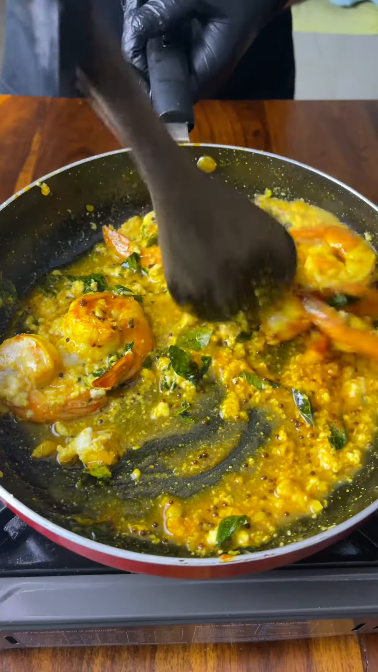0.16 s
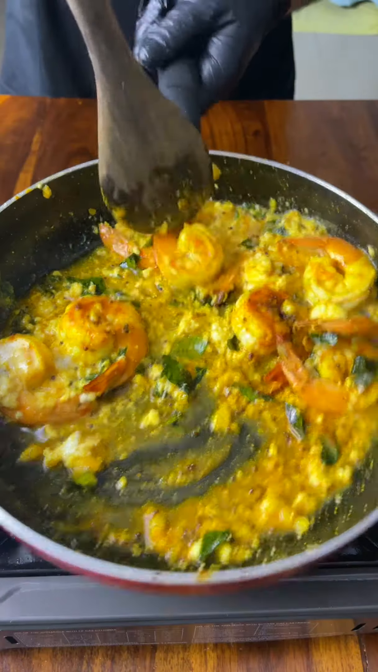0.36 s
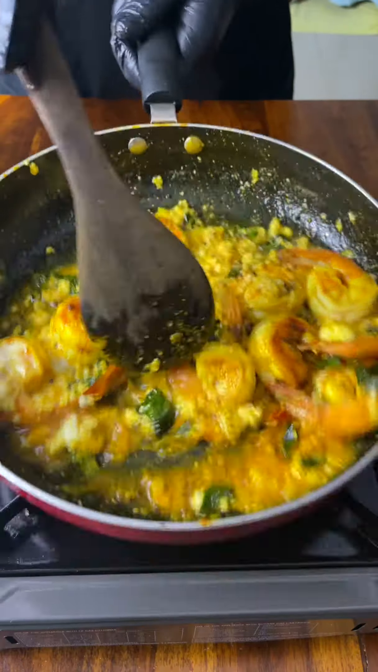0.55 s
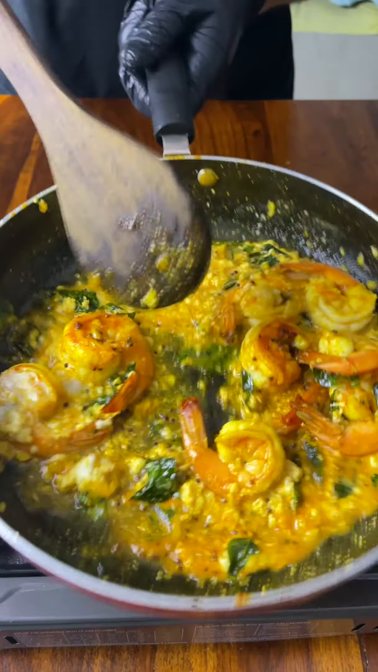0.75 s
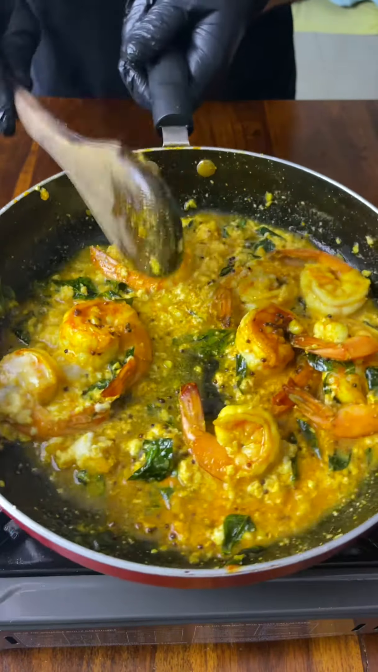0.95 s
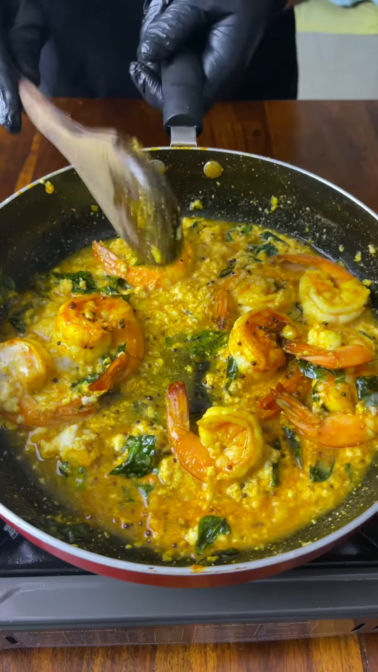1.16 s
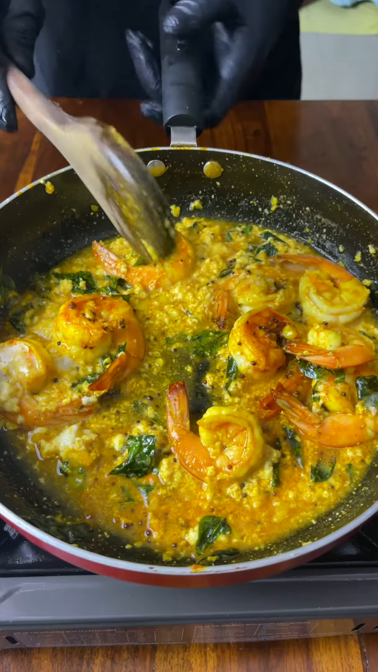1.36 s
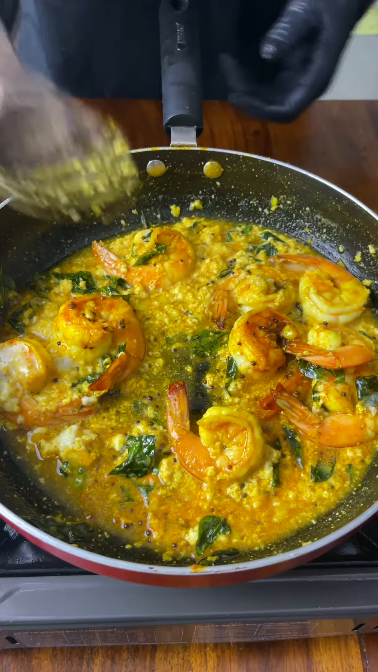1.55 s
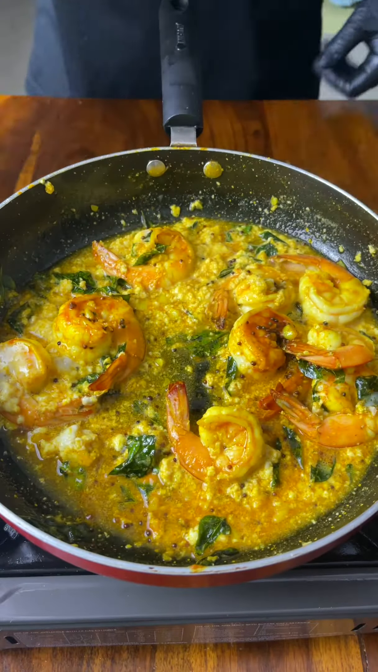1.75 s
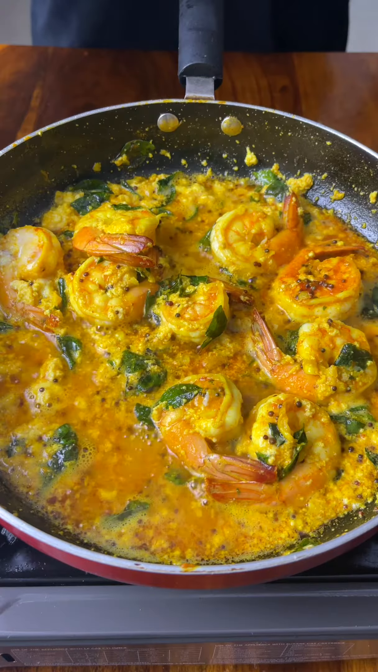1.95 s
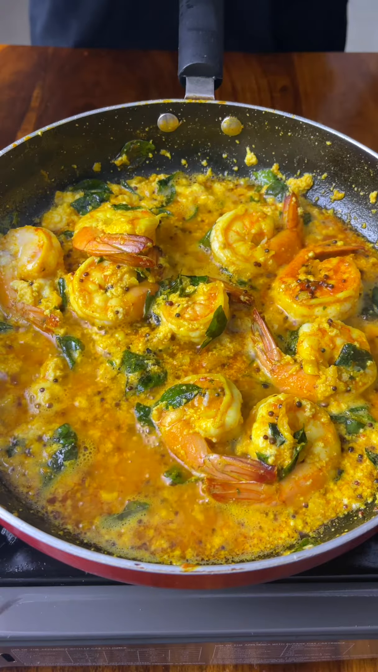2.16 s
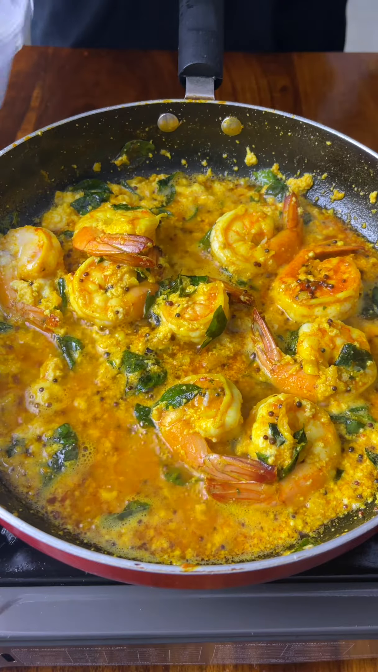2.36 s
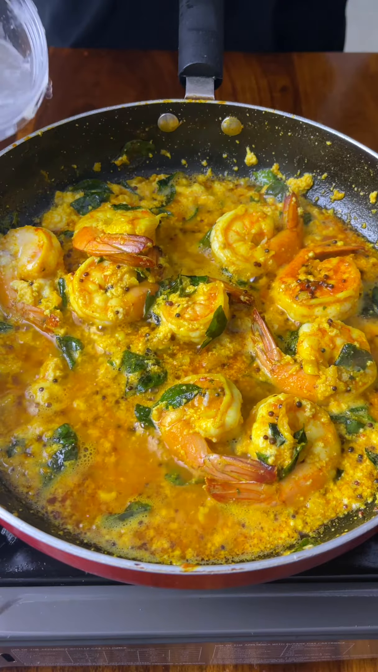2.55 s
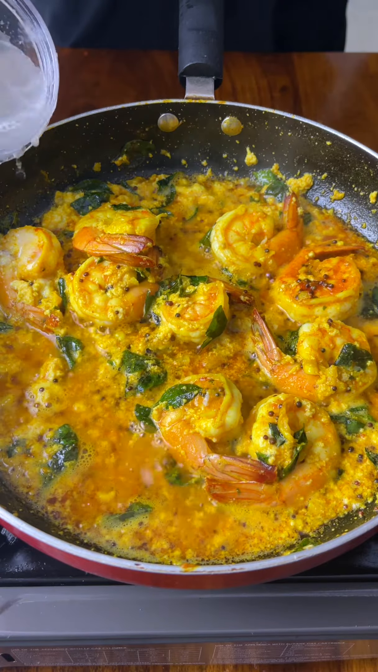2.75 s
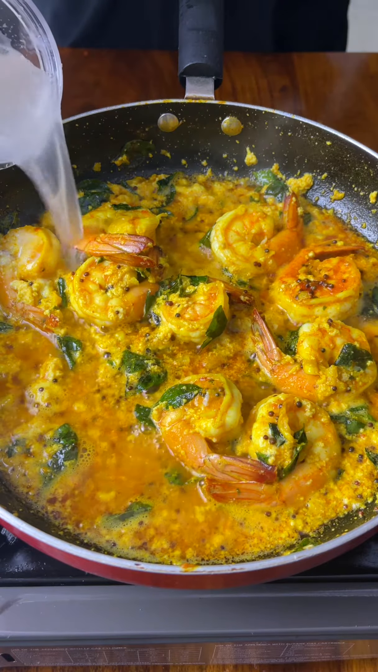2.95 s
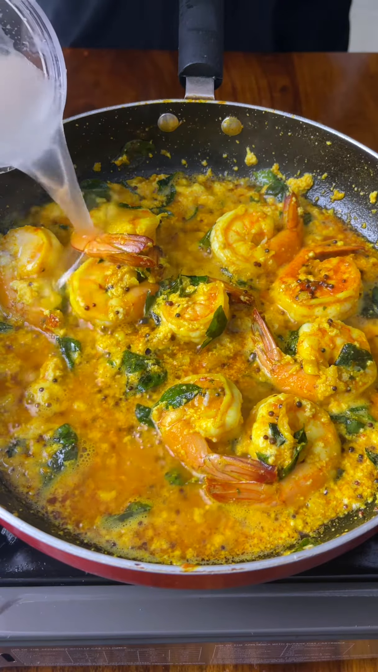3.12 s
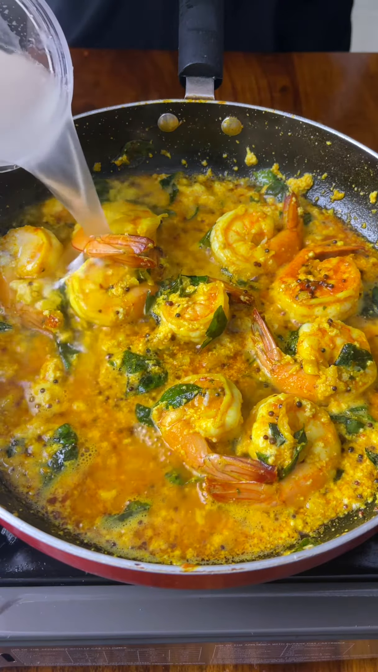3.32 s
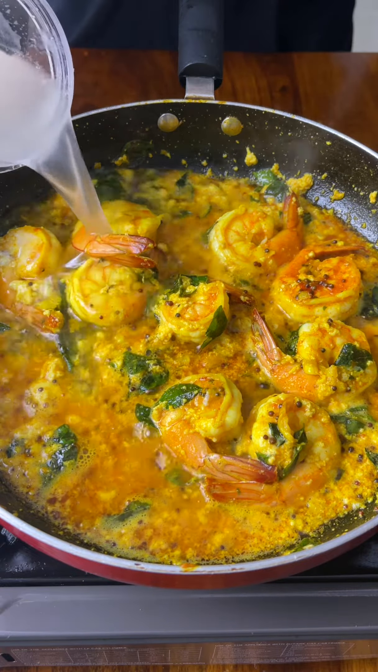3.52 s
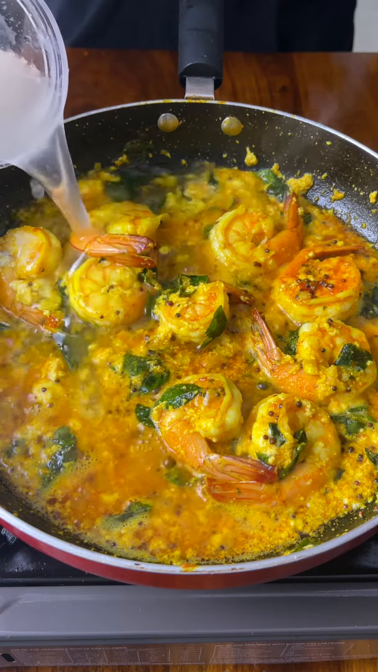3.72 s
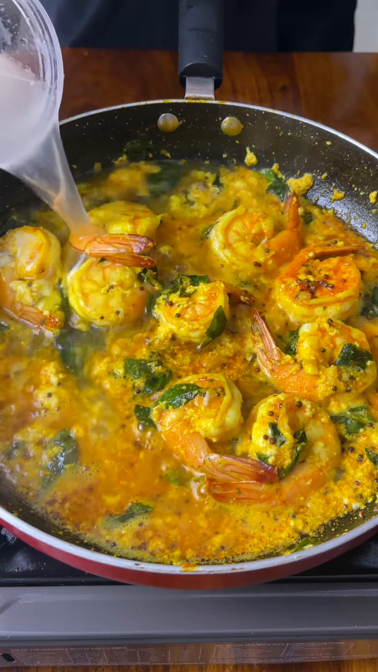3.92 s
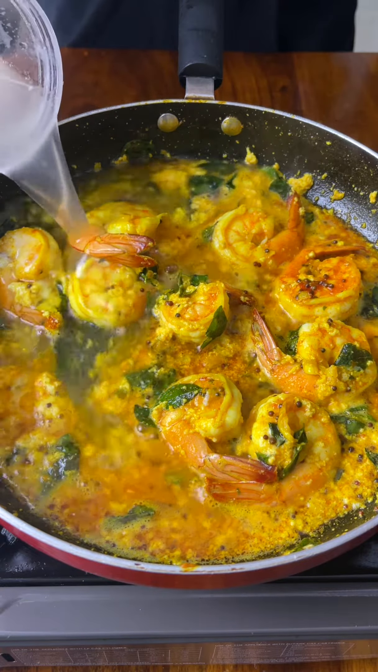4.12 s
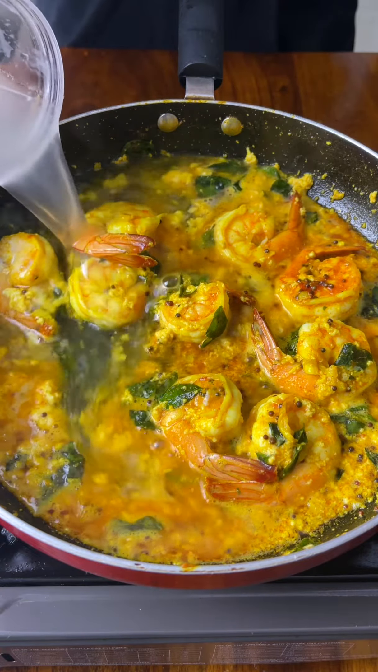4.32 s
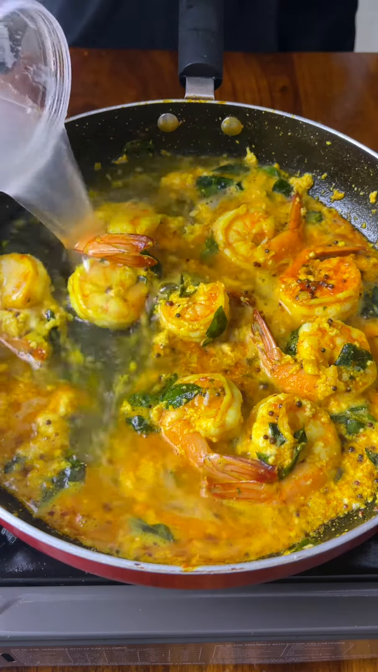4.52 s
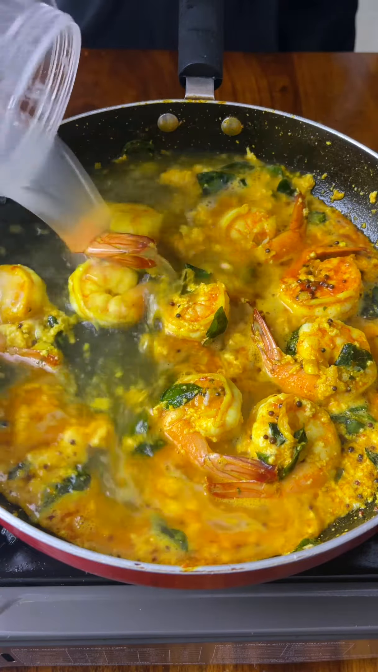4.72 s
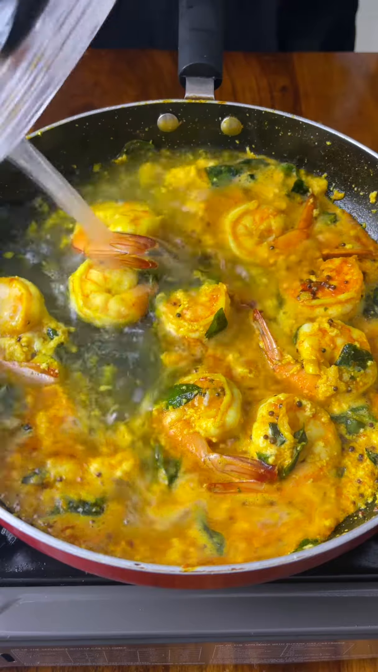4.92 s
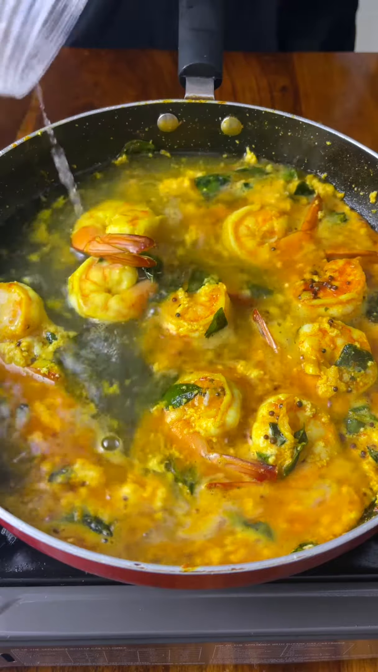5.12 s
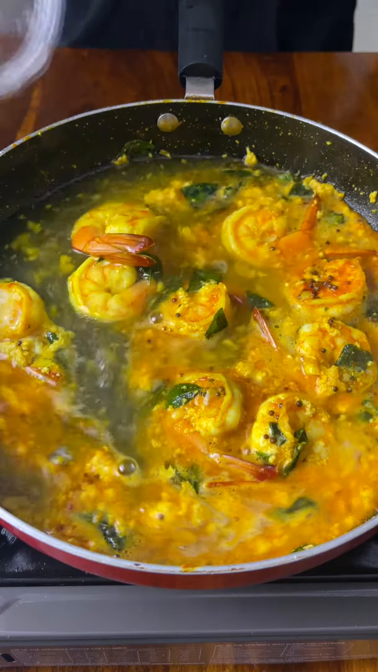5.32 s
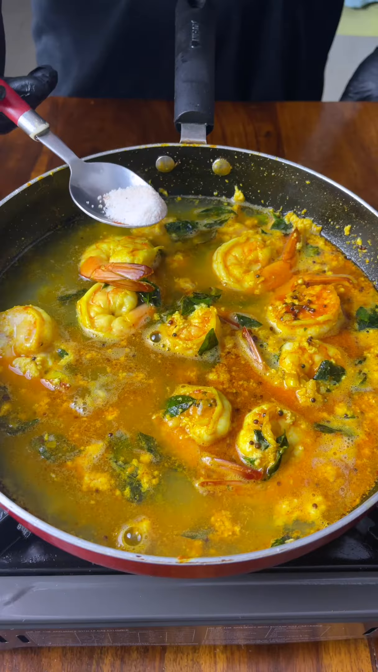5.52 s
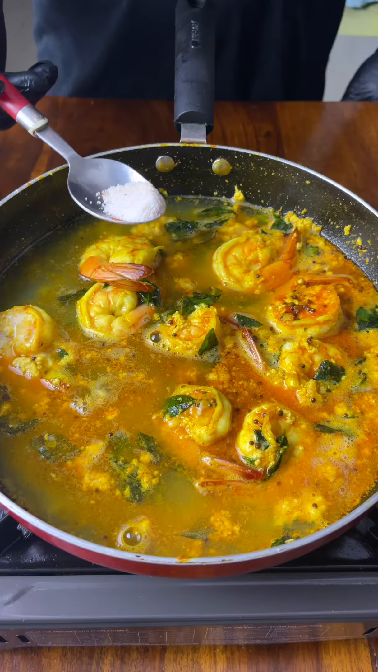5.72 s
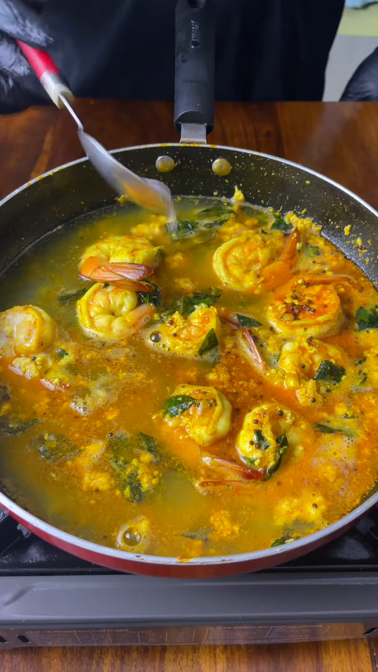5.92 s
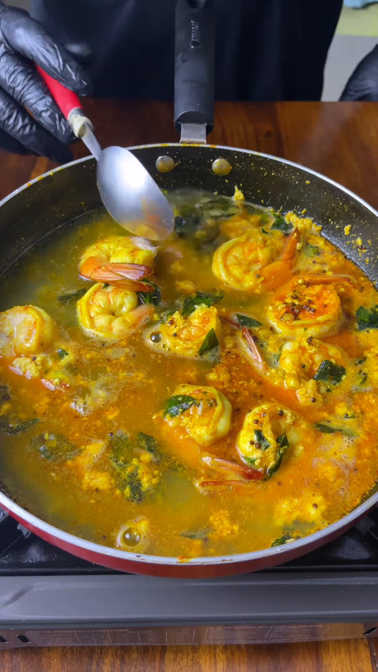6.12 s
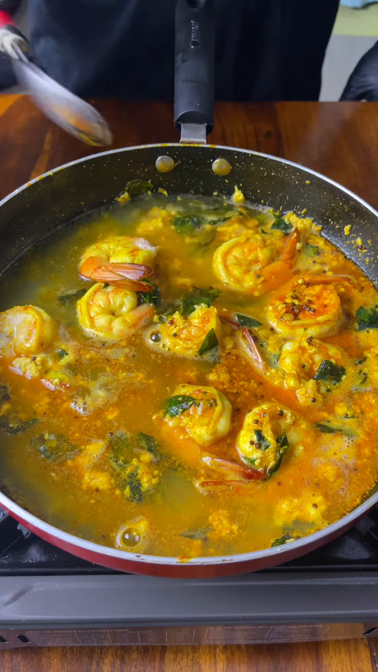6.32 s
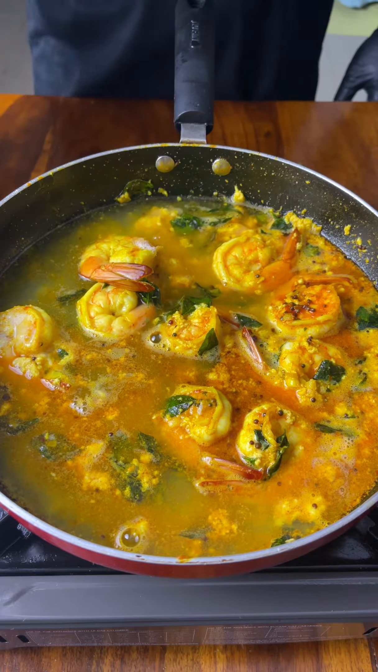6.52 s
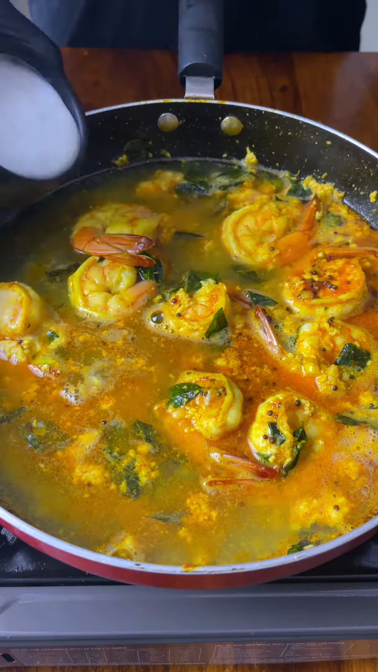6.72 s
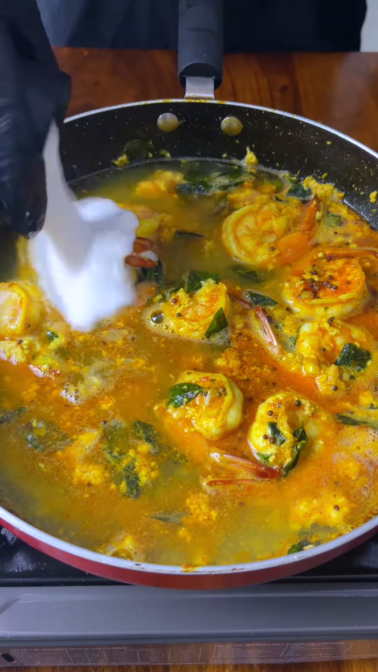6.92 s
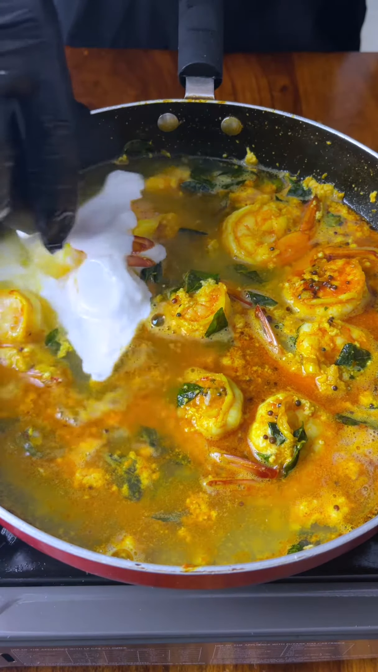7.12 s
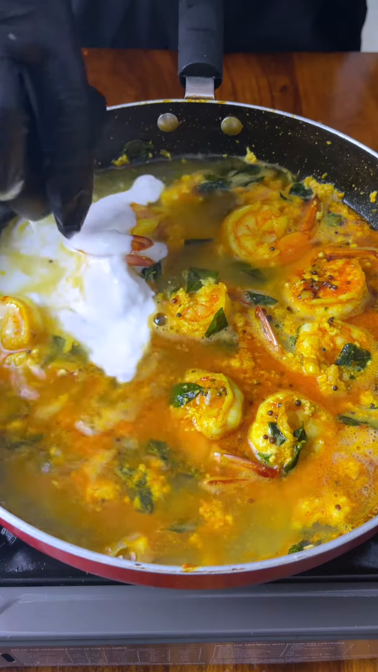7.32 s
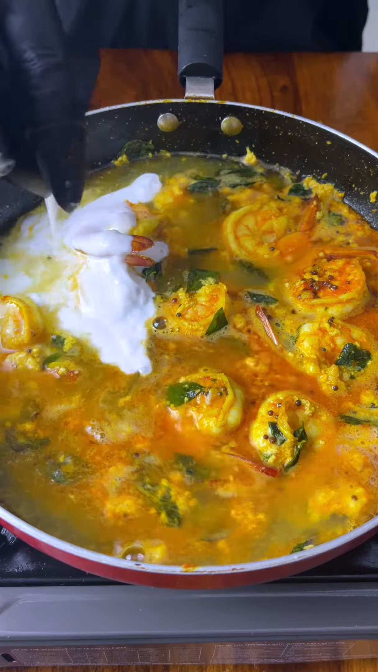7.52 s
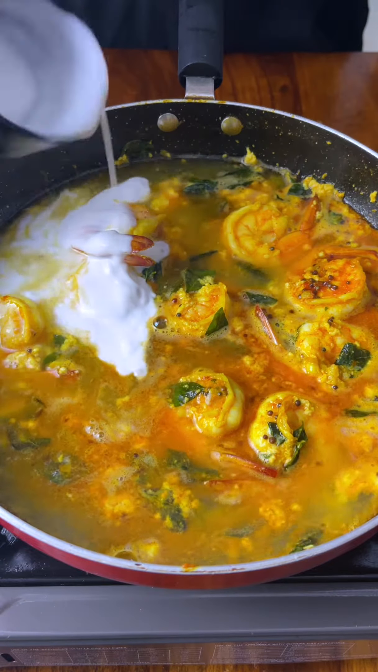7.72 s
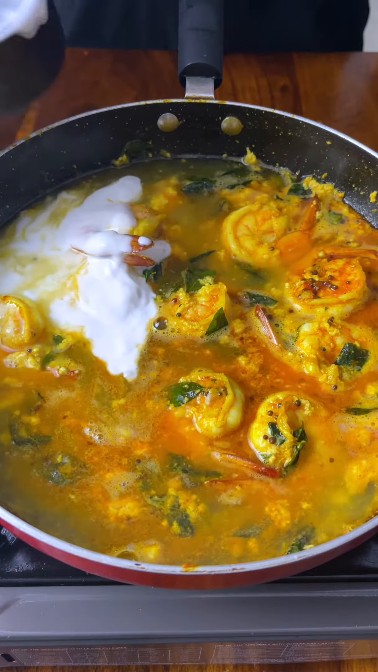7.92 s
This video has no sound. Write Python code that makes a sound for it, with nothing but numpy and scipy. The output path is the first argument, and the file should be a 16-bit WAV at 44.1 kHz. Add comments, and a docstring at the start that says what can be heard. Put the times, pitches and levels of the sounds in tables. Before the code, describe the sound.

Quick spatula scraping and rim knock over a very faint sizzle, then a splashy pour from a jug, a spoon knock and a bowl clunk.

```python
"""A faint far sizzle is heard first, over room tone; on it a wooden spatula scrapes and taps a frying pan.
At 1.87 s a kitchen's rumble and hiss take over: a jug is bumped and water trickles from it into the sauce,
then a spoon and a bowl are knocked down on the counter. Solid bodies are banks of decaying modes with noise
bursts, scraping is dense grit, water is a crowd of bubbles and drops, and backgrounds are filtered noise."""
import sys
import numpy as np
from scipy import signal
from scipy.fft import rfft, irfft, next_fast_len
from scipy.io import wavfile

SR = 44100
rng = np.random.default_rng(int(sys.argv[2]) if len(sys.argv) > 2 else 0)


def to_wav(sig):
    """Store sig (one row per channel, or 1-D mono) as 16-bit WAV at the path in sys.argv[1].

    Samples outside -1..1 are clipped; the rate is SR.
    """
    pcm = np.clip(np.atleast_2d(sig), -1, 1) * 32767
    pcm = np.round(pcm).astype(np.int16)
    wavfile.write(sys.argv[1], SR, pcm.T)  # frames by channels


N = 355887
BAND_EDGES_HZ = 22 * 2 ** np.arange(0, 9.9, .4)


def amp(db):
    """Decibel law: level in dB to amplitude ratio."""
    return 10 ** (np.asarray(db) / 20)


def rms_one(x):
    """Power normalisation: scale to rms 1."""
    return x / np.sqrt(np.mean(x ** 2) + 1e-20)


def in_time(rows):
    """Linear interpolation of each column at every sample; -140 (silent as a level) outside the span."""
    s, *columns = np.transpose(rows)
    t = np.arange(N) / SR
    return [np.interp(t, s, column, left=-140, right=-140) for column in columns]


def at_hz(points, hz):
    """Linear interpolation of a table on a logarithmic frequency axis."""
    f, value = np.array(points).T
    return np.interp(np.log(hz), np.log(f), value)


def drift(rate_hz):
    """Low-passed noise: a slow random wander of rms 1, computed at every 40th sample."""
    r = np.exp(-80 * np.pi * rate_hz / SR)
    white = rng.standard_normal(N // 40 + 2002)
    slow = signal.lfilter([1], [1, -2 * r, r * r], white)[2000:]     # the filter has settled by then
    return np.interp(np.arange(N) / 40, np.arange(len(slow)), rms_one(slow))


def ring(clicks, hz, t60):
    """Two-pole resonance: a unit click starts a decaying sine of initial height 1."""
    r, w = amp(-60 / (t60 * SR)), 2 * np.pi * hz / SR
    return signal.lfilter([0, np.sin(w)], [1, -2 * r * np.cos(w), r * r], clicks + 1e-18)


def colour(x, spectrum):
    """Linear filtering in the frequency domain: impose a spectrum on a dense sound; rms 1."""
    size = next_fast_len(N)
    hz = np.maximum(np.fft.rfftfreq(size, 1 / SR), 1)
    return rms_one(irfft(rfft(x, size) * amp(at_hz(spectrum, hz)), size)[:N])


def grains(per_s, spread_db):
    """Poisson-like impulse process: clicks at random times, of uneven size and random sign."""
    sizes = amp(spread_db * np.minimum(rng.exponential(1, N), 5)) * rng.choice([-1, 1], N)
    return sizes * (rng.random(N) < per_s / SR)


def narrow_noise(hz, width_hz):
    """Resonant filtering: noise through one mode whose bandwidth fixes its decay; rms 1."""
    t60 = np.log(1000) / (np.pi * width_hz)
    return rms_one(ring(rng.standard_normal(N), hz, t60))


# far background: t/s, room level/dB, sizzle level/dB
FAR_LEVELS = [(0.0, -56.5, -57.5), (1.868, -55.5, -61)]
# room tone spectrum: f/Hz, relative level/dB
FAR_ROOM_SPECTRUM = [(15, -36.5), (25, -7), (199, 0), (568, -9), (763, -7), (2300, -16), (4050, -17),
                     (4760, -17.5), (5750, -19.5), (7130, -20.5), (12900, -27), (15600, -21.5)]
# sizzle resonances: f/Hz, nominal width/Hz, level/dB
SIZZLE_RESONANCES = [(4000, 19, -11.5), (4130, 130, -3), (5000, 33, -9.5), (5520, 55, -2), (6000, 37, -2),
                     (6730, 140, -7.5), (9250, 220, -15.5), (12570, 84, -7), (14560, 30, -11.5),
                     (14900, 71, -11)]


def far_pan():
    """Resonant filtering: a sizzle of narrow noise bands, each flickering on its own, over room tone."""
    room_db, sizzle_db = in_time(FAR_LEVELS)
    sizzle = 0
    for hz, width_hz, level_db in SIZZLE_RESONANCES:
        flicker = amp(level_db + 2.9 * drift(18))
        sizzle = sizzle + flicker * narrow_noise(hz, 0.57 * width_hz)
    room = colour(rng.standard_normal(N), FAR_ROOM_SPECTRUM)
    return amp(room_db) * room + amp(sizzle_db) * rms_one(sizzle)


def blows(events, modes, noise, decays, ring_db, noise_db, crack_db):
    """Modal impact: each blow cracks, rings the body's modes and leaves noise that dies band by band."""
    out, t = np.zeros(N + SR), np.arange(SR // 4) / SR
    edges = list(zip(BAND_EDGES_HZ[2:], BAND_EDGES_HZ[3:]))
    filters = [signal.butter(2, pair, "band", fs=SR, output="sos") for pair in edges]
    centres = [np.sqrt(low * high) for low, high in edges]
    hz, level_db, t60 = np.transpose(modes)[..., None]
    for s, peak_db, low_db, tilt_db, factor, contact_ms in events:
        def shaped(hz):
            return amp(peak_db + low_db * (hz < 300) + tilt_db * np.log2(hz / 1000))
        factor = max(factor, .05)
        rise = (1 - np.exp(-1000 * t / max(contact_ms, .1))) ** 2      # a longer contact is softer
        # each blow excites the modes a little differently
        strength = shaped(hz) * amp(level_db + ring_db + 2.0 * rng.standard_normal(hz.shape))
        partials = strength * amp(-60 * t / (factor * t60)) * np.sin(2 * np.pi * hz * t)
        sound = rise * np.sum(partials, axis=0)
        white = rng.standard_normal((2, len(t)))      # neighbouring bands use different noise
        crack = amp(crack_db) * rise * np.exp(-t / 0.004)
        for k, (centre, sos) in enumerate(zip(centres, filters)):
            dying = amp(noise_db) * rise * amp(-60 * t / (factor * at_hz(decays, centre)))
            band = signal.sosfilt(sos, white[k % 2])
            sound += shaped(centre) * amp(at_hz(noise, centre)) * band * (dying + crack)
        out[round(s * SR):][:len(t)] += sound
    return out[:N]


# spatula edge catching or tapping the pan:
# t/s, level/dB, extra level below 300 Hz/dB, brightness/(dB per octave about 1 kHz), decay factor, contact/ms
PAN_TAPS = [(.347, 1.5, -14, -3.5, 1.3, .8), (.427, -2.5, -16, -.6, 1.4, .3), (.505, -2.5, -9, 1.5, .5, .4),
            (.522, 3, -14, 1.2, 1.1, .4), (.540, .6, -9, -1.2, 1.1, .5), (.587, -1.2, -13, 1.8, 1.2, .4),
            (.611, 6, -7, 4, 1.1, 1.5), (.662, -2.5, -11, -.6, 1.6, .7), (.758, 1.5, -9, .6, 1.1, .6),
            (.836, 2.5, -10, .6, .8, .3), (.912, -11, -15, -4, .3, 1.5)]
# pan modes: f/Hz, relative level/dB, t60/s before the decay factor
PAN_MODES = [(253, -2.5, 0.17), (541.5, -15, 0.14), (854, -8.5, 0.051), (1156, -7, 0.055), (1240, 7, 0.045),
             (1400, -10.5, 0.24), (1765, -5, 0.1), (1830, -3.5, 0.2), (2012, -10.5, 0.15),
             (2576, -11, 0.061), (3700, -18, 0.04), (4595, -17, .08)]
# noise of a tap: f/Hz, relative level/dB
TAP_NOISE_SPECTRUM = [(35, -50), (60, -14.5), (201, -7), (510, -14.5), (1020, -17), (1560, -8.5),
                      (1830, -11.5), (2060, -15.5), (2540, -16), (15600, -42)]
# decay of that noise: f/Hz, t60/s before the decay factor
TAP_NOISE_T60 = [(100, 0.21), (260, 0.3), (700, 0.2), (1840, 0.18), (4850, 0.12), (12800, 0.083)]


def spatula_taps():
    """Modal impact: the spatula's catches and taps ring the pan."""
    return blows(PAN_TAPS, PAN_MODES, TAP_NOISE_SPECTRUM, TAP_NOISE_T60, ring_db=-13, noise_db=6.0, crack_db=1.5)


def swells(s, held_s, level_db, rise_db_per_s, fall_db_per_s):
    """Exponential growth and decay, as straight lines in dB with a hold between; the loudest event wins."""
    t, out = np.arange(N) / SR, np.full(N, -140.)
    for start, held, top, fall in np.broadcast(s, held_s, level_db, fall_db_per_s):
        before, after = np.maximum(start - t, 0), np.maximum(t - start - held, 0)
        out = np.maximum(out, top - rise_db_per_s * before - fall * after)
    return out


# spatula strokes: t/s, held/s, time for the grind to fade 20 dB/s, grind level/dB, dry treble rasp level/dB
SPATULA_STROKES = [(0.356, 0.014, 0.0947, -17, -31.5), (0.451, 0.095, 0.0743, -14, -25),
                   (0.611, 0.0081, 0.0958, -9, -12.5), (0.765, 0.0093, 0.0329, -17.5, -35.5),
                   (0.843, 0.0098, 0.0433, -18, -35), (0.911, 0.0044, 0.0536, -32.5, -62)]
# broad grind spectrum: f/Hz, relative level/dB
GRIND_SPECTRUM = [(35, -47), (60, -21.5), (194, -4.5), (346, -26.5), (944, -7.5), (1190, 1.5), (1500, -6),
                  (1820, -2), (2160, -11.5), (6000, -32.5), (7800, -57), (13200, -120)]
# dry rasp spectrum: f/Hz, relative level/dB
RASP_SPECTRUM = [(1760, -34.5), (3000, 2), (3840, -0.5), (4150, -6), (9090, -14), (14500, -3), (15600, -10)]
PRESS_DB_PER_S, RASP_FADES_FASTER = 850, 1.7


def spatula_strokes():
    """Stick-slip friction: dense grit drives the pan modes under the stroke, with a dry rasp above."""
    s, held_s, fade_s, grind_db, rasp_db = np.transpose(SPATULA_STROKES)
    grind_db = swells(s, held_s, grind_db, PRESS_DB_PER_S, 20 / fade_s)
    rasp_db = swells(s, held_s, rasp_db, PRESS_DB_PER_S, RASP_FADES_FASTER * 20 / fade_s)
    grit = grains(3000 * amp(3.8 * drift(50)), 4.0)
    # the two lowest modes are left out, and the spatula damps the others
    modes = sum(amp(level_db) * ring(grit, hz, 0.44 * t60) for hz, level_db, t60 in PAN_MODES[2:])
    grind = rms_one(modes) + amp(0.5) * colour(grit, GRIND_SPECTRUM)
    rasp = colour(grains(5900, 1.73), RASP_SPECTRUM) * amp(3.0 * drift(60))
    return amp(grind_db) * grind + amp(rasp_db) * rasp


# spatula knocked off on the rim:
# t/s, level/dB, extra level below 300 Hz/dB, brightness/(dB per octave about 1 kHz), decay factor, contact/ms
RIM_BLOWS = [(1.442, -17.5, -8.5, -5.5, 0.061, 0.23), (1.447, -12, -15, 1, 1.7, 3.4),
             (1.455, 2.5, -2, 1.35, 0.97, 5.6), (1.512, -15, 9.5, -0.5, 0.76, 7)]
# rim modes: f/Hz, relative level/dB, t60/s before the decay factor
RIM_MODES = [(259, 9, .2), (400, -8, .1), (549, -5, .13), (1125, -3, .1), (1300, -9, .1), (1529, -13, .14),
             (2460, -20, .12), (3680, -12, .15), (4600, -17, .09)]
# noise of a rim tap: f/Hz, relative level/dB
RIM_NOISE_SPECTRUM = [(60, -4), (280, -6), (550, -4.5), (1120, -9.5), (2310, -17), (3850, -16.5),
                      (6740, -32), (15600, -32)]


def rim_taps():
    """Modal impact: the spatula is knocked off on the rim; the noise dies as for the pan taps."""
    return blows(RIM_BLOWS, RIM_MODES, RIM_NOISE_SPECTRUM, TAP_NOISE_T60,
                 ring_db=-13.0, noise_db=4.0, crack_db=11.0)


# kitchen background, louder under the pour and sagging after the knocks: t/s, rumble level/dB, hiss level/dB
KITCHEN_LEVELS = [(1.87, -36.5, -46), (2.85, -36, -45.5), (3.13, -31, -44), (3.5, -33.5, -42.5),
                  (4.89, -33, -45.5), (5.08, -36.5, -48), (5.98, -38, -48.5), (6.25, -42, -53.5),
                  (6.98, -35.5, -46), (7.2, -40, -51), (8.07, -37.5, -50)]
# rumble spectrum: f/Hz, relative level/dB
RUMBLE_SPECTRUM = [(12, -37), (20, -7), (35, -5.5), (54, 2), (148, -11), (217, -13), (294, -16), (487, -21),
                   (759, -22), (1140, -25), (1510, -25.5), (2500, -34.5), (3250, -37.5), (5500, -120)]
# hiss spectrum: f/Hz, relative level/dB
HISS_SPECTRUM = [(350, -5), (600, -8), (1060, -8), (1490, -1), (2410, -9), (3670, -7), (3990, -10.5),
                 (5230, -10.5), (15600, -11)]
# mains hum in the rumble: f/Hz, width/Hz, level/dB against the rumble
MAINS_HUM = [(51, 7.2, -17.5), (150.4, 7.3, -13)]
WHISTLE_HZ, WHISTLE_WIDTH_HZ = 3935, 22.4
WHISTLE_DB = -8      # against the hiss


def kitchen():
    """Filtered noise: rumble with hum, gently wavering hiss and a thin whistle that comes and goes."""
    rumble_db, hiss_db = in_time(KITCHEN_LEVELS)
    rumble = colour(rng.standard_normal(N), RUMBLE_SPECTRUM) * amp(0.83 * drift(2.9))
    hiss = colour(rng.standard_normal(N), HISS_SPECTRUM) * amp(.8 * drift(20))
    whistle = narrow_noise(WHISTLE_HZ, WHISTLE_WIDTH_HZ) * amp(2.1 * drift(22))
    hum = sum(amp(level_db) * narrow_noise(hz, width_hz) for hz, width_hz, level_db in MAINS_HUM)
    return amp(rumble_db) * (rumble + hum) + amp(hiss_db) * (hiss + amp(WHISTLE_DB) * whistle)


# jug bumped:
# t/s, level/dB, extra level below 300 Hz/dB, brightness/(dB per octave about 1 kHz), decay factor, contact/ms
JUG_BUMPS = [(2.725, -8, 5.5, 1.5, 0.62, 4.5), (3.004, -21.5, 24, 5.5, 0.34, 2.1),
             (3.022, -26, -24, -12, 0.37, 0.72), (3.093, -28, -29, -9, .1, 0.7),
             (3.143, -3.5, 1, 2, 0.77, 0.22)]
# jug modes: f/Hz, relative level/dB, t60/s before the decay factor
JUG_MODES = [(80.7, -5, 0.42), (256, -13, 0.38), (471, -1.5, 0.1), (586, 1.5, 0.11), (750, -22, 0.052),
             (1100, 9, 0.023), (1540, -3.5, 0.041), (1880, -16, 0.16), (2570, -26, 0.17)]
# noise of a bump: f/Hz, relative level/dB
BUMP_NOISE_SPECTRUM = [(35, -39), (60, 6.5), (586, -3), (1230, -20), (1670, -16), (1960, -23.5),
                       (2850, -34), (4130, -31.5), (4750, -46), (15600, -44)]
# decay of that noise: f/Hz, t60/s before the decay factor
BUMP_NOISE_T60 = [(80, 0.36), (210, 0.2), (560, 0.46), (1470, 0.34), (3880, 0.18)]


def jug_bumps():
    """Modal impact: the jug rings with a strong crack at each contact."""
    return blows(JUG_BUMPS, JUG_MODES, BUMP_NOISE_SPECTRUM, BUMP_NOISE_T60, ring_db=-1.5, noise_db=8.5, crack_db=28)


POUR = slice(round(2.9 * SR), round(5.3 * SR))      # while water runs
# the loudest single drops: t/s, peak level/dB, starting f/Hz
LOUD_DROPS = [(3.0117, -25, 3960), (3.0408, -23.5, 3640), (3.178, -26, 13200), (3.1934, -23, 5100),
              (3.266, -22, 13800), (3.2944, -11.5, 4730), (3.324, -17.5, 5910), (3.3568, -18.5, 14000),
              (3.4138, -21.5, 3760), (3.4482, -8, 10800), (3.5058, -16.5, 3700), (3.5272, -9.5, 4790),
              (3.5642, -11, 5000), (3.5909, -7, 13900), (3.605, -14, 3790), (3.6232, -15, 3670),
              (3.6624, -8, 3700), (3.7013, -22, 13200), (3.738, -18, 3640), (3.745, -20, 3300),
              (3.768, -10.5, 5520), (3.8402, -11, 5000), (3.8717, -12.5, 12000), (3.9117, -15, 3290),
              (3.9772, -14, 3900), (4.0284, -11, 4960), (4.058, -11, 5660), (4.074, -8, 4350),
              (4.088, -15, 4300), (4.1474, -15.5, 3330), (4.207, -18, 4260), (4.2403, -13, 3500),
              (4.272, -6.5, 10000), (4.3266, -12.5, 5410), (4.3452, -17, 3400), (4.395, -15, 3280),
              (4.447, -23, 4230), (4.5034, -22, 3380), (4.5416, -16, 3850), (4.572, -15, 3220),
              (4.5275, -23, 4060), (4.643, -21, 4150), (4.6994, -29, 3040), (4.656, -9, 14000),
              (4.8359, -22, 4020), (4.8825, -14.5, 4000), (4.9208, -23, 3980), (4.9308, -19.5, 3900),
              (5.0661, -34, 3640)]
# wet pan where the drops land: f/Hz, width/Hz, mean level/dB
WET_PAN_MODES = [(2430, 290, -8), (3220, 160, -12.5), (3700, 340, -8), (4260, 113, -4), (4883, 110, -10),
                 (5550, 174, -3), (6510, 130, -7), (8620, 200, -7), (10100, 110, -12), (12140, 150, -8),
                 (13300, 300, -7)]


def drop_ticks(drops_db):
    """Modal impact: drops tick on the wet pan, each striking its modes with other strengths."""
    ticks = amp(drops_db - 33.5) * rms_one(grains(260 * amp(4.0 * drift(30)), 2.7))
    s, peak_db, _ = np.transpose(LOUD_DROPS)
    ticks[np.round(s * SR).astype(int)] += amp(peak_db - 13)
    ticks = ticks[POUR]
    at, out = np.flatnonzero(np.abs(ticks) > 1e-7), np.zeros(len(ticks))
    scatter = rng.standard_normal((len(at), len(WET_PAN_MODES)))
    for k, (hz, width_hz, level_db) in enumerate(WET_PAN_MODES):
        strikes = np.zeros(len(ticks))
        strikes[at] = ticks[at] * amp(level_db + 8.0 * scatter[:, k])
        soft = ring(strikes, hz, 0.0071) * amp(-27)      # the drop spreads over a millisecond
        out += ring(soft, hz, np.log(1000) / (np.pi * width_hz))
    return out


# weight of small bubbles by pitch: f/Hz, level/dB before a further weight of f to the power 1.3
BUBBLE_WEIGHTS = [(410, -38), (700, -23.5), (1500, -5), (1750, -0.5), (2780, -2.5), (3620, 10), (5540, -30),
                  (7300, -4.5), (14000, -7.5)]


def swarm(level_db, low_hz, high_hz, per_s, ring_cycles):
    """Bubble resonance: clumps of small bubbles of 20 pitches; ringing twice softens each onset."""
    born = grains(per_s * amp(3.8 * drift(30)), 5.2)[POUR]
    pitches, dealt = np.geomspace(low_hz, high_hz, 20), rng.integers(0, 20, N)[POUR]
    small = 0
    for k, hz in enumerate(pitches):
        first = ring(born * (dealt == k), hz, ring_cycles / hz)
        small = small + amp(at_hz(BUBBLE_WEIGHTS, hz)) * hz ** 1.3 * ring(first, hz, 19.0 / hz)
    return amp(level_db[POUR]) * rms_one(small)


# spray spectrum: f/Hz, relative level/dB
SPRAY_SPECTRUM = [(880, -66), (1500, -16), (2830, -4), (4070, -11), (4580, 4), (6770, 0), (14200, 4),
                  (15600, -1)]


def spray(level_db):
    """Band-wise modulated noise: fine droplets hiss in patches, each band flickering on its own."""
    fine, out = colour(grains(4000, 1.7), SPRAY_SPECTRUM)[POUR], 0
    for edges in zip(BAND_EDGES_HZ[15:], BAND_EDGES_HZ[16:]):
        band = signal.sosfilt(signal.butter(2, edges, "band", fs=SR, output="sos"), fine)
        out = out + band * amp(3.0 * drift(35)[POUR])
    spatters = amp(6.8 * drift(66)[POUR])      # these cross all bands
    return amp(level_db[POUR]) * rms_one(out * spatters)


def bubbles(events, ring_cycles, onset_cycles, rise):
    """Bubble resonance: each swells, falls 60 dB in a set number of cycles and rises in pitch."""
    out, t = np.zeros(N), np.arange(SR // 10) / SR
    for s, peak_db, hz in events:
        cycles = hz * t
        shape = (1 - np.exp(-cycles / onset_cycles)) ** 2 * amp(-60 * cycles / ring_cycles)
        tone = np.sin(2 * np.pi * cycles * (1 + rise * cycles))
        out[round(s * SR):][:len(t)] += amp(peak_db) * shape / shape.max() * tone
    return out


NEAR_WALLS_T60_S, NEAR_WALLS_DB = 0.071, -11


def near_walls(x):
    """Reverberation: convolution with a short dense tail of reflections, added to the direct sound."""
    t = np.arange(SR // 4) / SR
    tail = rng.standard_normal(len(t)) * amp(-60 * t / NEAR_WALLS_T60_S) * (t > .003)
    return x + amp(NEAR_WALLS_DB) * signal.fftconvolve(x, tail / np.sqrt(np.sum(tail ** 2)))[:N]


# thin stream between the surges: t/s, level/dB
THIN_STREAM = [(2.96, -52), (3.4, -62), (3.54, -37), (3.71, -33), (4.0, -32), (4.2, -29.5), (4.4, -25.5),
               (4.87, -36), (5.05, -35), (5.1, -55)]
# surges over the lip of the jug: t/s, held/s, drops level/dB, spray level/dB, low gurgle level/dB
LIP_SURGES = [(3.01, 0.022, -35, -35.5, -70), (3.148, 0.0037, -46, -31, -70), (3.29, .02, -50, -43, -70),
              (3.45, 0.082, -26, -23.5, -21.5), (3.614, 0.028, -25.5, -24, -18),
              (3.773, 0.067, -22.5, -25.5, -33), (3.855, 0.068, -27.5, -30.5, -26),
              (4.028, 0.078, -26, -24.5, -28.5), (4.27, 0.011, -36, -30, -50),
              (4.335, 0.035, -23, -39, -21)]
# the loudest air pockets glugging under the stream: t/s, peak level/dB, starting f/Hz
AIR_GLUGS = [(3.232, -24, 760), (3.455, -14.5, 726), (3.474, -12, 1800), (3.516, -13.5, 1690),
             (3.614, -22, 1330), (3.784, -23.5, 1210), (3.822, -14, 1830), (3.853, -16.5, 1780),
             (3.899, -20.5, 1950), (3.944, -23.5, 1930), (4.015, -26, 1170), (4.032, -16, 2340),
             (4.149, -25, 2380), (4.338, -27, 1089), (4.356, -21.5, 563), (4.395, -27, 1027),
             (4.465, -28, 1130), (4.576, -30, 940), (4.867, -31, 850), (4.981, -30, 1330)]
# a lone drip from the bowl and a smaller one after it: t/s, peak level/dB, starting f/Hz
BOWL_DRIPS = [(6.906, -18, 1100), (6.931, -32, 900)]
# the stream's own rush: f/Hz, relative level/dB
RUSH_SPECTRUM = [(290, -38), (500, -8.5), (2110, -8), (3630, -3), (4080, -6), (4530, -8.5), (8000, -20.5),
                 (10400, -49), (17600, -120)]
STREAM_SPRAY_DB, STREAM_GURGLE_DB = -7, -9.5      # against the drops
SURGE_RISE_DB_PER_S, SURGE_FALL_DB_PER_S, GURGLE_FALL_DB_PER_S = 1100, 345, 203


def trickle():
    """Superposition: drop ticks, bubbles, spray and rush sum as a stream with surges, then reverberate."""
    (stream_db,) = in_time(THIN_STREAM)
    s, held_s, drops_db, spray_db, gurgle_db = np.transpose(LIP_SURGES)
    drop_surges = swells(s, held_s, drops_db, SURGE_RISE_DB_PER_S, SURGE_FALL_DB_PER_S)
    spray_surges = swells(s, held_s, spray_db, SURGE_RISE_DB_PER_S, SURGE_FALL_DB_PER_S)
    gurgle_surges = swells(s, held_s, gurgle_db, SURGE_RISE_DB_PER_S, GURGLE_FALL_DB_PER_S)
    drops_db = np.maximum(stream_db, drop_surges)
    spray_db = np.maximum(stream_db + STREAM_SPRAY_DB, spray_surges)
    gurgle_db = np.maximum(stream_db + STREAM_GURGLE_DB, gurgle_surges)
    out = np.zeros(N)
    out[POUR] += drop_ticks(drops_db)
    out[POUR] += swarm(drops_db - 7.0, low_hz=2383, high_hz=13250, per_s=1200, ring_cycles=45.0)
    out[POUR] += swarm(gurgle_db - 9.0, low_hz=642, high_hz=2467, per_s=900, ring_cycles=68.0)
    out[POUR] += spray(spray_db)
    out += bubbles(LOUD_DROPS, ring_cycles=73.0, onset_cycles=0.74, rise=0.00081)
    out += bubbles(AIR_GLUGS, ring_cycles=48.0, onset_cycles=0.28, rise=0.0011)
    out += bubbles(BOWL_DRIPS, ring_cycles=5.5, onset_cycles=0.33, rise=0.008)
    rush = colour(grains(1500 * amp(5.9 * drift(40)), 3.15), RUSH_SPECTRUM)
    out += amp(drops_db - 8.0) * rush
    return near_walls(out)


# air in the emptying jug, its resonance falling until 5 s: t/s, f/Hz, level/dB
JUG_AIR_GLIDE = [(3.6, 1400, -64), (3.75, 1330, -42.5), (4.3, 1073, -53), (5.0, 824, -49), (5.07, 837, -55)]


def jug_air():
    """Air resonance: a narrow wavering band, noise on a quadrature carrier, glides down as the jug empties."""
    hz, level_db = in_time(JUG_AIR_GLIDE)
    phase = 2 * np.pi * np.cumsum(hz) / SR
    return amp(level_db) * (drift(18) * np.cos(phase) + drift(16.2) * np.sin(phase))


# spoon knocked down:
# t/s, level/dB, extra level below 300 Hz/dB, brightness/(dB per octave about 1 kHz), decay factor, contact/ms
SPOON_KNOCKS = [(5.982, 11.5, 6, 3, 0.37, 3.1), (5.996, 2.5, -3.5, -2, 0.51, 0.81),
                (6.004, -6, 3.5, 0.8, 1.33, 2.3)]
# spoon on the counter, modes: f/Hz, relative level/dB, t60/s before the decay factor
SPOON_MODES = [(91, 9.5, 0.09), (241, -1.5, 0.15), (1230, -9, 0.15), (1330, 0.5, 0.26), (1530, -3, 0.13),
               (1696, -3, .15), (2980, -11, 0.32), (3280, -9, 0.079), (4150, -14, .15), (5040, -16, .13),
               (7120, -15, 0.12)]
# noise of a knock: f/Hz, relative level/dB
SPOON_NOISE_SPECTRUM = [(35, -31), (60, -10), (278, -2), (600, -16.5), (1100, -3), (2260, -15), (4230, -13),
                        (6000, -23), (14500, -28.5), (15600, -30.5)]
# decay of that noise: f/Hz, t60/s before the decay factor
SPOON_NOISE_T60 = [(80, 0.2), (210, 0.39), (560, 0.29), (1470, 0.26), (3880, 0.28), (10200, 0.2)]


def spoon():
    """Modal impact: the spoon is knocked down on the counter in a quick cluster of blows."""
    return blows(SPOON_KNOCKS, SPOON_MODES, SPOON_NOISE_SPECTRUM, SPOON_NOISE_T60,
                 ring_db=-19.0, noise_db=4.5, crack_db=-10)


# bowl landing:
# t/s, level/dB, extra level below 300 Hz/dB, brightness/(dB per octave about 1 kHz), decay factor, contact/ms
BOWL_LANDING = [(7.019, 5, -18, 2.5, 0.36, 0.95), (7.030, 3.5, -7.5, -0.4, 0.37, 0.56),
                (7.042, -8, -9, -1.5, 1.2, 2)]
# bowl modes: f/Hz, relative level/dB, t60/s before the decay factor
BOWL_MODES = [(89, 4, 0.32), (234, 4, 0.3), (460, -9, 0.22), (1103, -1.5, 0.18), (1400, 4.5, 0.1),
              (1493, 8.5, 0.092), (1800, 3.5, 0.13), (2400, -13, .3), (2860, -9, .3), (3460, -9, .3),
              (4130, -15, .2), (4950, -12, .35), (7550, -15, 0.18)]
# noise of the landing: f/Hz, relative level/dB
BOWL_NOISE_SPECTRUM = [(35, -45), (60, -11), (464, -7), (722, -20.5), (1420, -7.5), (2160, -15.5),
                       (3430, -9.5), (4640, -21), (7740, -28), (15600, -48)]
# decay of that noise: f/Hz, t60/s before the decay factor
BOWL_NOISE_T60 = [(80, 0.33), (210, 0.24), (560, 0.28), (1470, 0.28), (3880, 0.27), (10200, 0.089)]


def bowl():
    """Modal impact: the bowl lands on the counter in a quick cluster of blows."""
    return blows(BOWL_LANDING, BOWL_MODES, BOWL_NOISE_SPECTRUM, BOWL_NOISE_T60,
                 ring_db=-16.5, noise_db=1.5, crack_db=1.0)


MIC_LOW_HZ = 58


def scene():
    """Superposition: all sources add at one microphone, some of them with their deep bass removed."""
    spatula = spatula_taps() + spatula_strokes() + rim_taps()
    low_cut = signal.butter(4, MIC_LOW_HZ, "high", fs=SR, output="sos")
    thin = signal.sosfilt(low_cut, far_pan() + spatula + spoon() + bowl())
    return (thin + kitchen() + jug_bumps() + trickle() + jug_air())[None]


CUTOFF_HZ = 15760


def record(dry):
    """Saturation, then band limiting: peaks clip at full scale and the top of the treble is cut."""
    low_pass = signal.ellip(12, .3, 70, CUTOFF_HZ, fs=SR, output="sos")
    return signal.sosfilt(low_pass, np.clip(dry, -1, 1))


dry = scene()
out = record(dry)
to_wav(out)
```